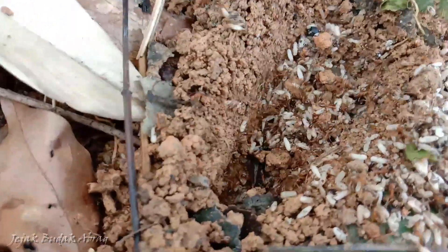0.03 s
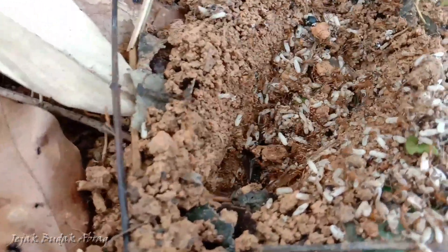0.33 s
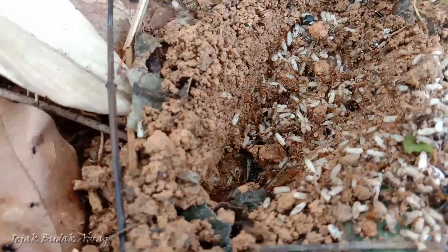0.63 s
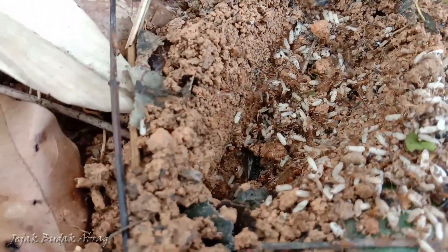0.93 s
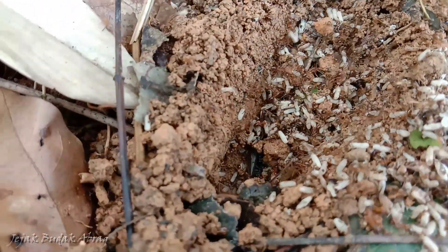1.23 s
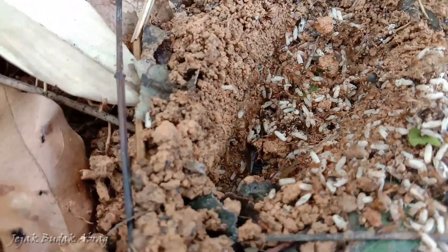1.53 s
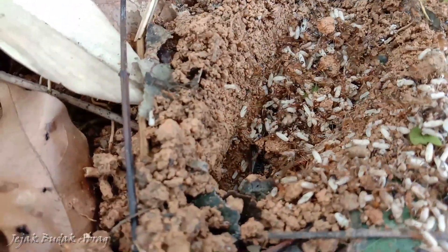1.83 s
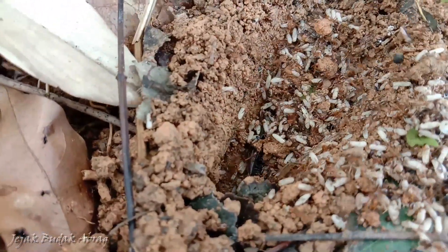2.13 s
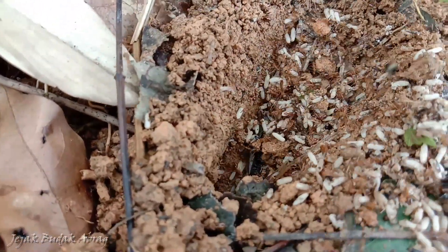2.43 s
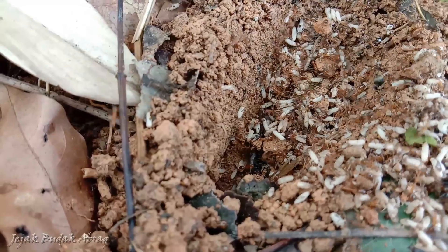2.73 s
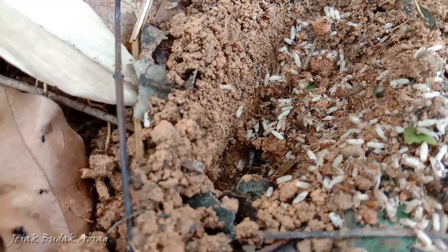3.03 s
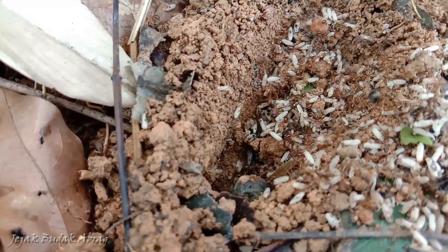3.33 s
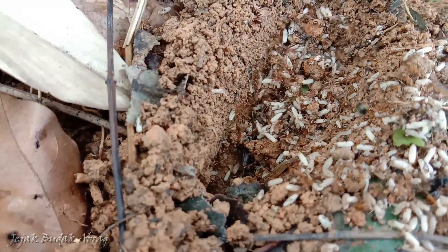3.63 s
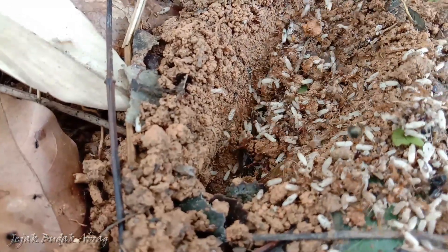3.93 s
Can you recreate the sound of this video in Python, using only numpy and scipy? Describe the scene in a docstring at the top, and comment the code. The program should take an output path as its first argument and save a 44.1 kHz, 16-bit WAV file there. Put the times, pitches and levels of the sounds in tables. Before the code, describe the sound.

Crickets trill steadily on a high note in a daytime forest, with faint cicadas and distant rumble. Soil crumbs tick and bump softly at first, then a dry leaf clicks sharply close to the microphone. Far birds call faintly.

```python
"""A forest floor by day. Throughout: crickets trill near 5 kHz by wing strokes and cicadas whine,
over distant rumble, air and insect sizzle. In the first 0.5 s soil crumbs tick, soft bumps land and
a far bird starts to pip. At 1.5 s a speck strikes a dry leaf close by, which cracks and rings.
Near 3 s a nearer cicada swells, a second bird whistles and the rumble rises. A last tick at 3.7 s."""
import sys
import numpy as np
from scipy import signal
from scipy.fft import rfft, irfft, next_fast_len
from scipy.io import wavfile
from scipy.ndimage import map_coordinates

SR = 44100
rng = np.random.default_rng(int(sys.argv[2]) if len(sys.argv) > 2 else 0)


def log_audio(samples):
    """Write samples as a 16-bit WAV file to the path given in sys.argv[1]."""
    # one column per channel
    frames = np.atleast_2d(samples).T
    # limit to full scale, then quantise
    limited = np.clip(frames, -1, 1)
    pcm = np.round(limited * 32767).astype(np.int16)
    wavfile.write(sys.argv[1], SR, pcm)


N = 176400


def crickets():
    """Six trillers chirp as a crowd; soloists come and go; one sings above the rest."""
    # crowd envelope (time [s], level [dB])
    chorus = [(0.0, -54), (0.96, -50), (1.74, -51.5), (1.77, -58), (1.85, -47.5), (2.14, -53), (2.4, -49.5),
              (2.62, -53.5), (3.28, -50), (3.51, -53.5), (4.0, -49.5)]
    # one cricket stands out (start [s], length [s], pitch [Hz], level [dB])
    soloists = [(0.68, 0.85, 4868, -53.5), (0.746, 0.27, 4986, -60), (1.429, 0.18, 4808, -51.5),
                (2.352, 1.17, 4864, -53), (3.107, 0.27, 4950, -51.5)]
    # louder spells of the highest cricket (start [s], length [s], level [dB])
    high_spells = [(1.124, 0.36, -58.5), (1.484, 0.28, -61), (2.274, 0.2, -62), (3.537, 0.15, -63)]
    crowd_hz, spread_hz, chirps_per_s = 4848, 125, 23
    crowd = 0
    for place in np.linspace(-1, 1, 6):
        hz = crowd_hz + spread_hz * place + 18 * wobble(10)
        voice = trill(hz, strokes_per_s=57 * np.exp(.15 * rng.normal()),
                      duty=0.81, sag_hz=49.6, scatter_hz=18, scatter_db=4)
        crowd += amp(-4 * place ** 2) * voice
    chirping = amp(1.3 * tone(chirps_per_s * (1 + wobble(20) / 4)))
    crowd = amp(curve(chorus)) * unit(crowd * chirping)
    solo = 0
    for s, length, hz, db in soloists:
        voice = trill(hz, strokes_per_s=80, duty=0.88, sag_hz=19, scatter_hz=4, scatter_db=2.5)
        solo += amp(db) * spell(s, length) * voice
    high = trill(hz=5119, strokes_per_s=48, duty=1, sag_hz=0, scatter_hz=2.3, scatter_db=1.5)
    high *= amp(-67.5) + sum(amp(db) * spell(s, length) for s, length, db in high_spells)
    return forest(crowd + solo + high, wet_db=-6.5, side_db=-32)


def trill(hz, strokes_per_s, duty, sag_hz, scatter_hz, scatter_db):
    """Each wing stroke is a short sagging tone with its own strength and pitch."""
    strokes = np.cumsum(strokes_per_s * (1 + 0.0197 * wobble(5))) / SR + rng.random()
    count, u = np.divmod(strokes, 1)
    force, detune = rng.standard_normal((2, N))[:, count.astype(int)]
    envelope = arch(u / duty) * amp(scatter_db * np.tanh(force))
    return unit(envelope * tone(hz - sag_hz * (u - .5) + scatter_hz * detune))


def cicadas():
    """A drifting whine and its neighbour come in phrases; a nearer cicada swells and sags."""
    # drone drift (time [s], pitch [Hz])
    drone_pitch = [(0, 3482), (.4, 3436.5), (.75, 3420.5), (1.1, 3473), (1.47, 3501), (2, 3463.5),
                   (2.6, 3420), (3, 3484.5), (3.25, 3503), (4, 3440)]
    # drone overtones (multiple, level [dB])
    overtones = [(2, -74), (4, -73)]
    # phrases of whine (start [s], length [s], level [dB])
    phrases = [(0.063, 0.07, -61), (0.268, 0.18, -75), (0.824, 0.061, -62), (0.93, 0.21, -68),
               (1.18, 0.069, -66), (1.303, 0.2, -69), (1.535, 0.1, -65), (1.698, 0.063, -71),
               (2.083, .13, -72), (2.246, 0.33, -74.5), (2.643, 0.15, -63), (2.913, 0.18, -71.5),
               (3.205, 0.12, -67.5), (3.38, 0.64, -70.5)]
    # nearer cicada (start [s], length [s], top pitch [Hz], level [dB])
    swells = [(-.2, .37, 3560, -63), (2.72, .17, 3580, -62), (2.825, .28, 3592, -65.5)]
    # its partials (multiple, relative level [dB])
    partials = [(1, 1), (2, -2), (3, -17.5), (4, -2.5)]
    neighbour_hz, sag_hz = 3495, 85.8
    drone_hz = curve(drone_pitch)
    gain = amp(-72.5) + sum(amp(db) * spell(s, length) for s, length, db in phrases)
    flutter = amp(0.94 * wobble(120))
    whine = amp(-6) * tone(drone_hz) + tone(neighbour_hz + 22 * wobble(120))
    out = gain * unit(flutter * whine)
    for k, db in overtones:
        out += amp(db + 6 / k * wobble(18)) * buzz(k * drone_hz, rough_hz=40)
    for s, length, top_hz, db in swells:
        u = np.clip((clock() - s) / length, 0, 1)
        hz = top_hz - sag_hz * u ** 3
        for k, partial_db in partials:
            out += arch(u) * amp(db + partial_db + 6 * wobble(29.84)) * buzz(k * hz, rough_hz=k * 45)
    return forest(out, wet_db=0.5, side_db=-21)


def buzz(hz, rough_hz, clicks_per_s=115):
    """A rough whine, rippled by the clicks of a cicada's drum."""
    whine = tone(hz + rough_hz * wobble(900))
    return unit(whine * amp(0.5 * tone(clicks_per_s + 2 * wobble(17))))


def litter():
    """Specks strike a dry leaf, the ground and soil crumbs, which ring in damped modes."""
    # leaf strikes (time [s], level [dB])
    taps = [(1.4792, -19.5)]
    # leaf modes (frequency [Hz], relative level [dB], t60 [s])
    leaf_modes = [(344, -20, 0.027), (487, -24.5, 0.049), (1171, -7, 0.031), (1243, -0.5, 0.026),
                  (1540, -10, 0.021), (2095, -9, 0.017), (2950, -7.5, 0.0083), (3720, 4, 0.0085),
                  (4860, -17, 0.011), (5320, -8.5, 0.012), (6040, -19, 0.018), (7070, -0.5, 0.0082),
                  (7188, -2.5, 0.0093), (7710, -9, 0.013)]
    # soft ground strikes (time [s], level [dB])
    bumps = [(0.073, -43.5), (.172, -30.5), (0.371, -45)]
    # ground modes (frequency [Hz], relative level [dB], t60 [s])
    ground_modes = [(119, -10.5, 0.15), (215, 5, 0.011), (430, -4.5, 0.016), (1260, -11.5, 0.042)]
    # soil crumbs (time [s], main mode [Hz], level [dB], t60 [s])
    ticks = [(0.074, 1890, -48, 0.0062), (0.17, 2090, -46.5, 0.0078), (.1715, 7550, -50, 0.012),
             (0.4097, 5880, -33.5, 0.012), (3.745, 8165, -56.5, .025)]
    highpass_hz, crunch_width_hz = 90, 1100
    out = 0
    for s, db in taps:
        crack = lowpass(grit(s, t60=0.0058), hz=7960)
        out += amp(db) * (ring(s, leaf_modes, attack_s=0.0014) + amp(-6) * crack)
    thuds = sum(amp(db) * ring(s, ground_modes, attack_s=0.00052) for s, db in bumps)
    out += filtered(thuds, lambda f: (1j * f / (highpass_hz + 1j * f)) ** 2)
    for s, hz, db, t60 in ticks:
        crunch = filtered(grit(s, t60), lambda f: 1 / (1 + ((f - hz) / crunch_width_hz) ** 2))
        crumb_modes = [(hz, 0, t60), (hz * 0.685, -4, t60)]
        out += amp(db) * (ring(s, crumb_modes, attack_s=0.00027) + 1.6 * crunch)
    return forest(out, wet_db=-21.5, side_db=-17)


def ring(s, modes, attack_s):
    """Damped modes struck at time s."""
    t = np.maximum(clock() - s, 0)
    attack = 1 - np.exp(-(t / attack_s) ** 2)
    return attack * sum(amp(db - 60 * t / t60) * np.sin(2 * np.pi * hz * t) for hz, db, t60 in modes)


def grit(s, t60):
    """A puff of noise decaying from time s."""
    t = np.maximum(clock() - s, 0)
    return rng.standard_normal(N) * (t > 0) * amp(-60 * t / t60)


def birds():
    """Soft pips and a few whistles from far among the trees."""
    # first bird (start [s], level [dB])
    pips = [(0.33, -62), (0.81, -68.5), (1.06, -63.5), (1.52, -69.5), (1.74, -67.5), (2.16, -64.5),
            (2.51, -63), (2.89, -64), (3.2, -67.5), (3.68, -65.5), (3.83, -66.5)]
    # second bird (start [s], length [s], pitch [Hz], level [dB], pitch roughness [Hz])
    whistles = [(2.799, 0.043, 2234, -59, 86.5), (2.86, 0.027, 2220, -63, 100),
                (2.896, 0.057, 2575, -52, 34.8), (2.932, 0.037, 2390, -60, 109),
                (2.973, 0.13, 2565, -63, 41.3), (3.566, 0.11, 2570, -67, 30),
                (3.925, 0.11, 2470, -64.5, 201)]
    pip_s, pip_hz = 0.096, 1257
    t = clock()
    out = sum(amp(db) * arch((t - s) / pip_s) for s, db in pips) * tone(pip_hz + 28 * wobble(200))
    for s, length, hz, db, rough_hz in whistles:
        out += amp(db) * arch((t - s) / length) * tone(hz + rough_hz * wobble(400))
    return forest(out, wet_db=-0.5, side_db=-10)


def background():
    """Distant swelling rumble, air and the sizzle of countless far insects."""
    # air and rumble spectrum (frequency [Hz], relative density [dB])
    air_spectrum = [(15, -57), (25, -14), (49, -18), (77, -7.5), (121, 1.5), (188, -7.5), (344, -12.5),
                    (1020, -19), (1250, -12), (1360, -19.5), (3100, -21.5), (4030, -56), (6820, -120)]
    # rumble envelope (time [s], gain [dB])
    rumble_swell = [(0, 1), (2.65, -2), (3.05, 3), (3.5, -2.5)]
    # treetop insect spectrum (frequency [Hz], relative density [dB])
    sizzle_spectrum = [(2600, -37), (3200, -4), (3550, -0.5), (4500, -3.5), (5600, -2.5), (5950, 1),
                       (6500, -10), (6950, -4), (8200, -10.5), (10000, -12), (13000, -18), (13700, 1.5),
                       (14300, -15), (15500, -4.5)]
    noise = rush(air_spectrum)
    rumble = lowpass(noise, hz=189)
    air = (noise - rumble) * amp(0.92 * wobble(10))
    sizzle = amp(-62.5 + 1.4 * wobble(16)) * rush(sizzle_spectrum)
    return amp(-60) * (air + rumble * amp(curve(rumble_swell))) + sizzle


def rush(spectrum):
    """Shaped stereo noise of rms 1."""
    # left-right likeness (frequency [Hz], correlation)
    alike = [(30, 0.61), (100, 1), (500, 0.8), (2500, 0.44), (5000, 0.93), (9000, 0.7), (14000, 0.85)]

    def response(hz):
        angle = np.arccos(np.clip(along(alike, hz), -1, 1)) / 2
        return amp(along(spectrum, hz)) * [np.cos(angle), np.sin(angle)]

    mid, side = filtered(rng.standard_normal((2, N)), response)
    return unit(np.array([mid + side, mid - side]))


def forest(x, wet_db, side_db):
    """Direct sound plus scatter from trunks and leaves, in stereo."""
    # scatter decay (frequency [Hz], t60 [s])
    decay = [(200, 0.033), (3000, 0.28), (14000, 0.18)]
    hz, t, noise = signal.stft(rng.standard_normal((2, SR // 2)), SR, nperseg=256)
    tail = signal.istft(noise * amp(-60 * t / along(decay, hz)[:, None]), SR, nperseg=256)[1]
    tail /= np.linalg.norm(tail[0])
    mid, side = amp(wet_db) * signal.fftconvolve(x[None], tail, axes=1)[:, :N]
    return (x + mid + amp(side_db) * np.array([side, -side])) / np.hypot(1, amp(wet_db))


def amp(db):
    """Decibels to gain."""
    return 10 ** (np.asarray(db) / 20)


def unit(x):
    """Scale to rms 1."""
    return x / np.sqrt(np.mean(x ** 2) + 1e-20)


def clock():
    """Sample times in s."""
    return np.arange(N) / SR


def along(points, hz):
    """(Hz, value) points read on a log axis."""
    f, v = np.transpose(points)
    return np.interp(np.log(hz + 1), np.log(f + 1), v)


def curve(rows):
    """(s, value) points read at every sample."""
    return np.interp(clock(), *np.transpose(rows))


def wobble(knots_per_s):
    """Smooth random curve."""
    return map_coordinates(rng.standard_normal(8192), [clock() * knots_per_s + 4], mode="wrap")


def tone(hz):
    """Sine of rms 1 along a pitch curve."""
    return np.sqrt(2) * np.sin(2 * np.pi * (np.cumsum(hz) / SR + rng.random()))


def arch(u):
    """Half-sine over u = 0 to 1."""
    return np.sin(np.pi * np.clip(u, 0, 1))


def spell(s, length, edge_s=0.028):
    """Gate with linear edges, opening at time s."""
    t = clock() - s
    return np.clip(np.minimum(t, length - t) / edge_s, 0, 1)


def filtered(x, response):
    """Apply a frequency response."""
    m = next_fast_len(N + SR // 2)
    return irfft(rfft(x, m) * response(np.fft.rfftfreq(m, 1 / SR)), m)[..., :N]


def lowpass(x, hz):
    """Zero-phase low-pass, 24 dB per octave."""
    return filtered(x, lambda f: 1 / (1 + (f / hz) ** 4))


def scene():
    """All sources summed."""
    return crickets() + cicadas() + birds() + litter() + background()


def record(dry):
    """Hard band limit."""
    top_hz = 15560
    return filtered(dry, lambda hz: hz < top_hz)


dry = scene()
out = record(dry)
log_audio(out)
```